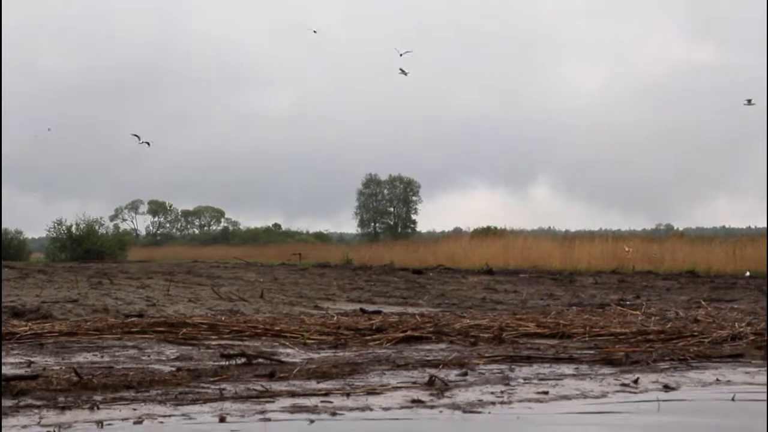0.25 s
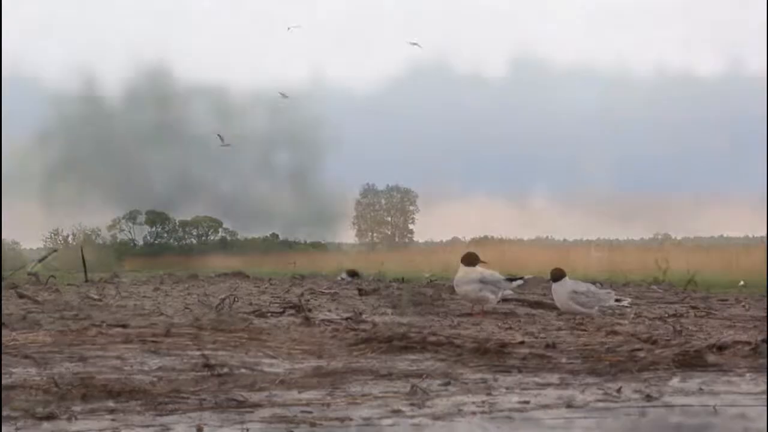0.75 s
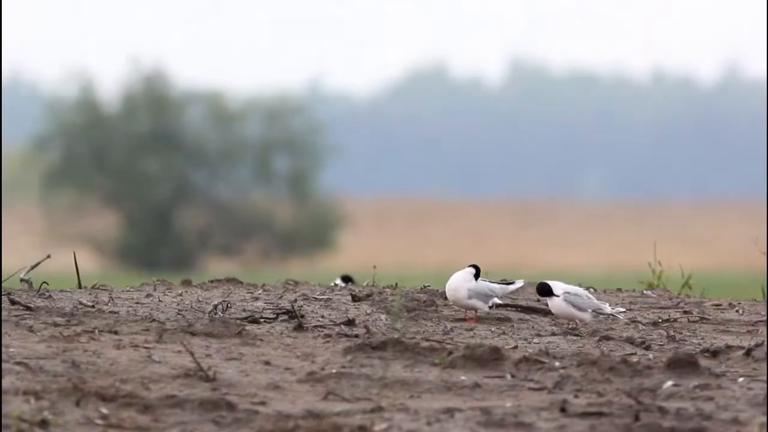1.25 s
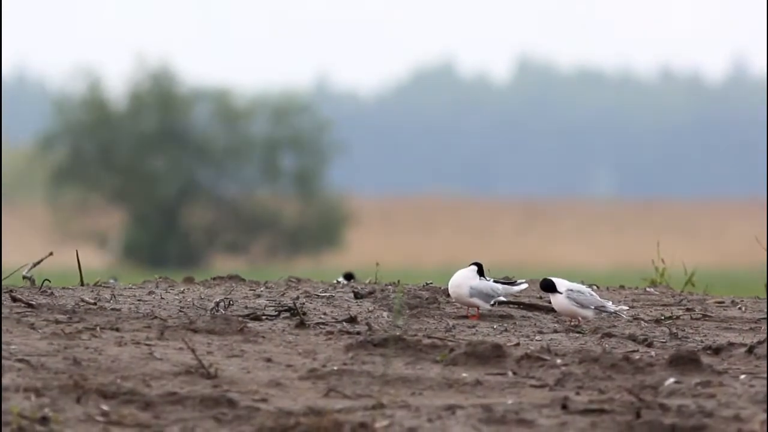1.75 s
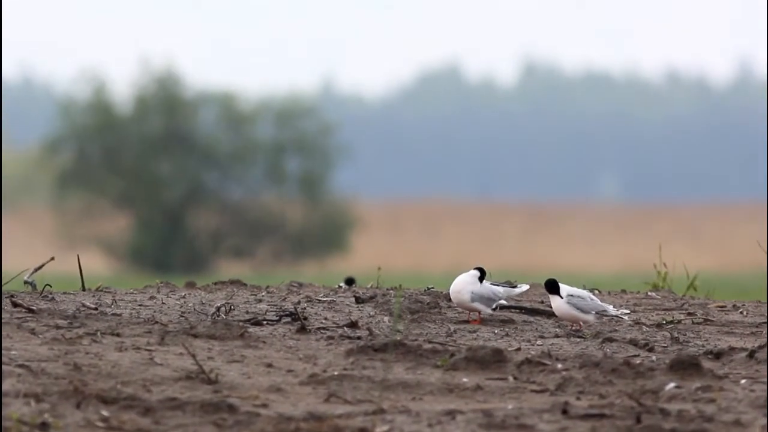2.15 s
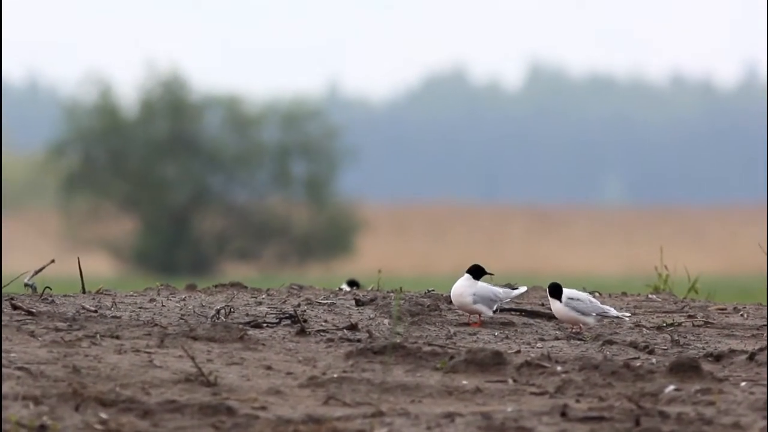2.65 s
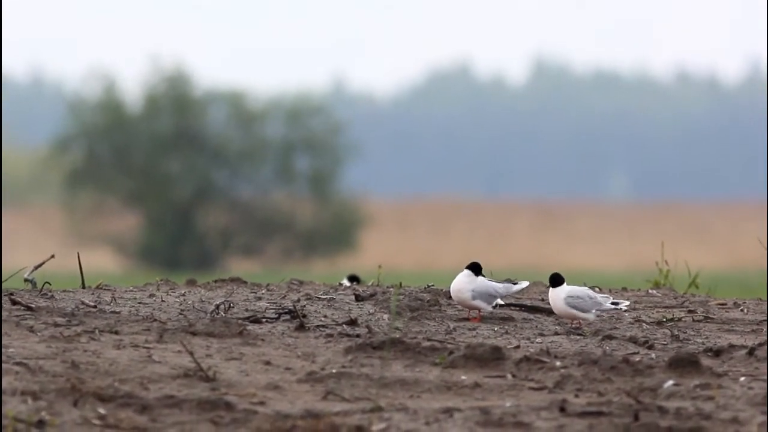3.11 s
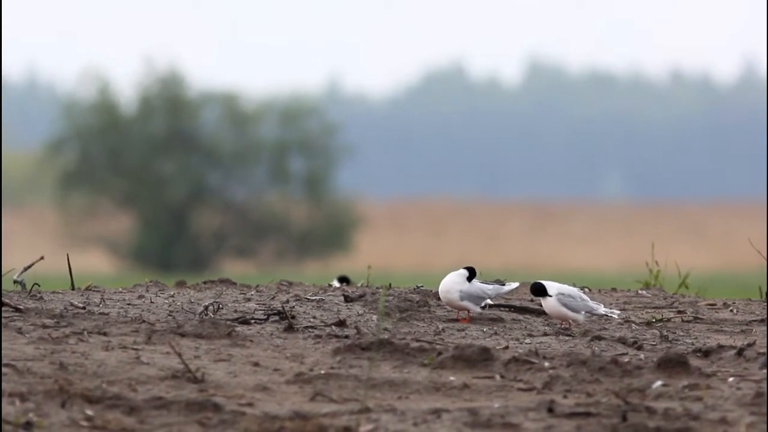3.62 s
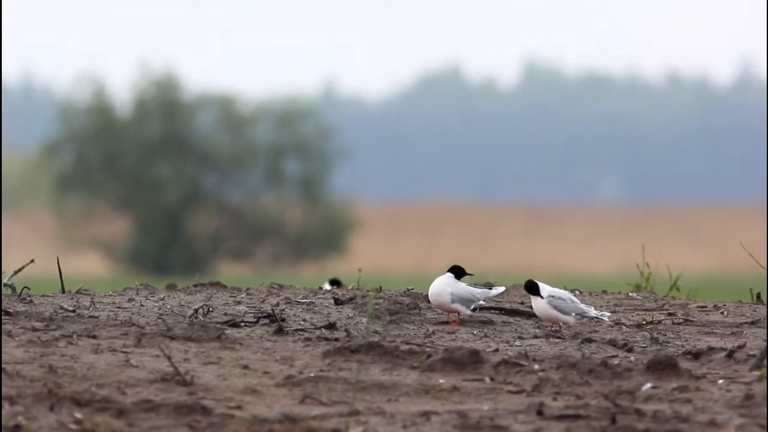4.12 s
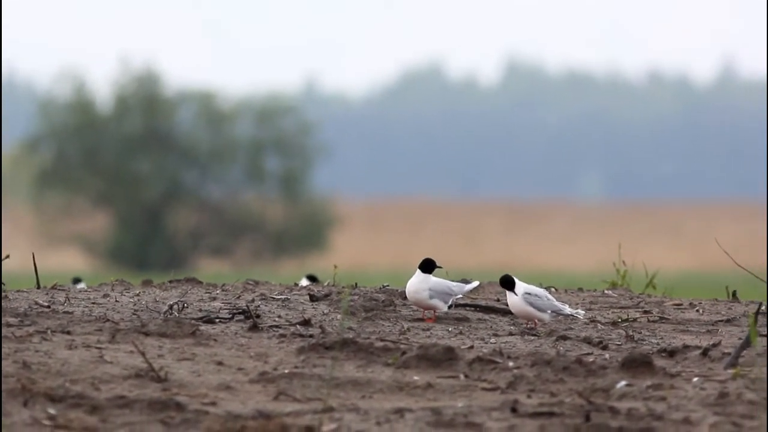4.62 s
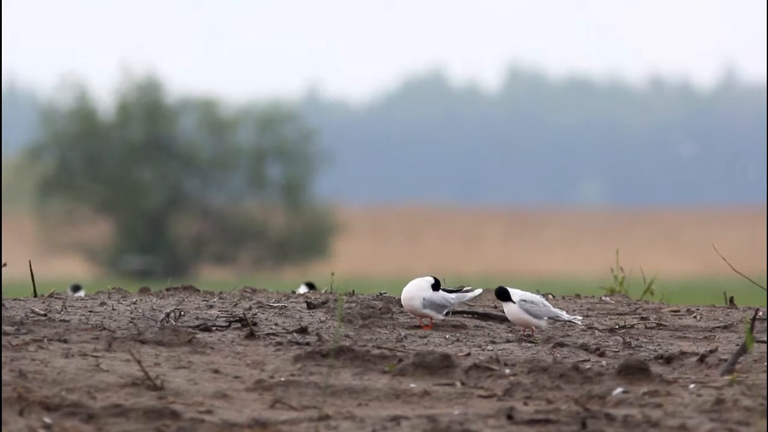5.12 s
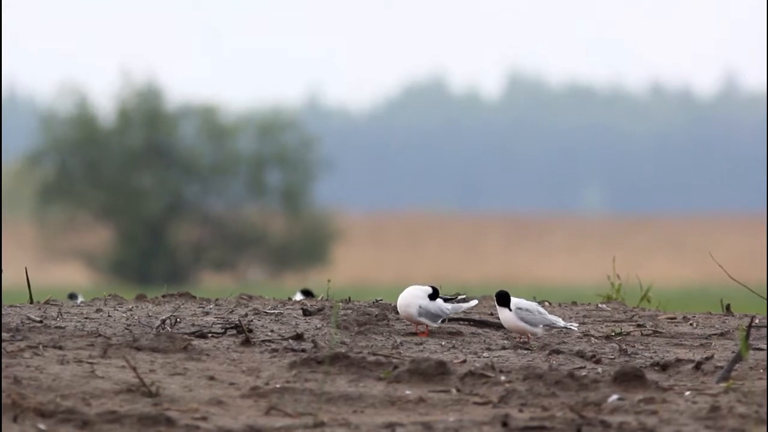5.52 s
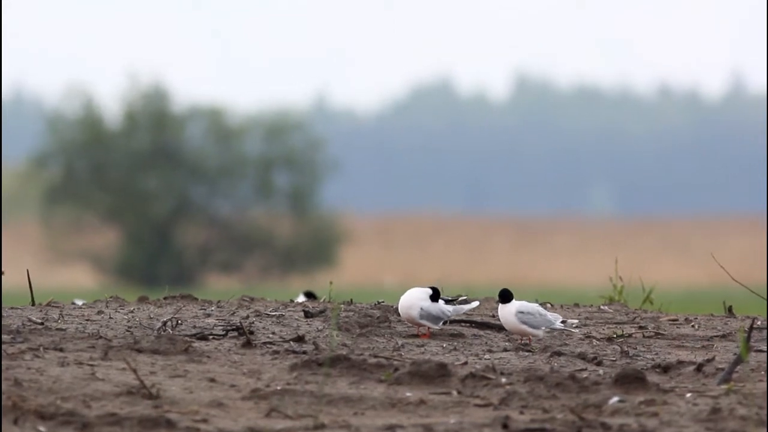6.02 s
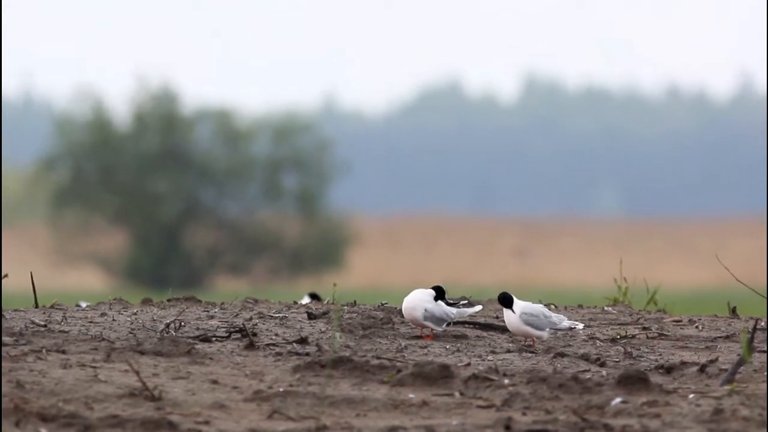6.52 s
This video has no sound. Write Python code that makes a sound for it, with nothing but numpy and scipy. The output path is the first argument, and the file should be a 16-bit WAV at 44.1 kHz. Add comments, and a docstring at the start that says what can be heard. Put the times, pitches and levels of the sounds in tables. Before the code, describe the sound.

A dense, close din of squawking gulls over a mudflat stops abruptly, leaving quieter scattered calls, dry ticking and soft open-air murmur.

```python
"""Gull colony on a riverside mudflat

A close, dense din; from 1.218 s a quieter spot with scattered calls.
Calls: falling harmonic stacks shaped by a throat resonance, some starting with a squeak or hoarse.
Din: many overlapping calls, coloured noise and a thin sine whine.
Quiet spot: fainter gulls, far rasps and a whistle (swept sines), murmuring noise, ringing dry ticks."""
import sys
import numpy as np
from scipy import signal
from scipy.fft import rfft, irfft
from scipy.io import wavfile

SR = 44100
rng = np.random.default_rng(int(sys.argv[2]) if len(sys.argv) > 2 else 0)


def waveform_to_disk(signal):
    """Save audio, clipped to [-1, 1], as 16-bit WAV at the path in sys.argv[1]."""
    frames = np.transpose(np.atleast_2d(signal))
    scaled = np.clip(frames, -1, 1) * 32767
    samples = np.round(scaled).astype(np.int16)
    wavfile.write(sys.argv[1], SR, samples)


N = 298116
T = np.arange(N) / SR

# calls that stand out: start_s, length_s, pitch_hz, sag_per_s (share of pitch), level_db (nominal),
# throat_hz, hoarseness (0-1)
GULL_CALL_TABLE = [(0.0, 0.13, 919, 0.5, -30, 2100, 0.14), (0.093, .1, 1341, 0.5, -27.5, 2830, 0.14),
                   (0.167, 0.1, 1393, 0, -31.5, 2380, 0.1), (0.268, 0.057, 989, -1, -22.5, 2320, 0.21),
                   (0.368, 0.063, 1346, -2, -28, 2540, 0.01), (0.401, 0.094, 1220, 1.8, -26, 4200, 0),
                   (0.479, .11, 970, 1.1, -22, 2510, 0.01), (0.524, 0.11, 1400, 1.5, -33.5, 2850, 0.16),
                   (0.678, 0.054, 1009, -0.2, -26, 2780, 0.33), (0.74, 0.091, 1052, 0.13, -20, 3180, 0),
                   (0.839, 0.059, 1067, -3, -27, 2880, 0.27), (0.923, 0.1, 945, 0.5, -28.5, 2560, .15),
                   (0.998, 0.048, 1013, 1, -24, 2550, 0.39), (1.111, 0.11, 1030, 1.7, -28.5, 2870, 0.07),
                   (1.163, 0.07, 994, -1.5, -20, 2400, 0.45), (1.218, 0.084, 948, 2, -31.5, 2850, 0),
                   (1.31, 0.072, 1130, -0.7, -39, 2940, 0.52), (1.491, 0.058, 1170, -.4, -39, 3080, 0.51),
                   (1.685, .076, 1144, -2.6, -39, 2950, .4), (1.886, .046, 1190, -3.5, -38, 3000, .45),
                   (1.927, 0.089, 930, 1.5, -52.5, 3340, .1), (2.031, .09, 1188, 0.4, -51.5, 3700, 0.07),
                   (2.198, 0.087, 910, 2, -36.5, 2910, 0.05), (2.359, 0.089, 1153, 1.2, -45.5, 4400, 0),
                   (2.497, .11, 1045, 1, -50, 2880, 0.04), (2.633, 0.085, 1183, 0.1, -50, 4020, 0.08),
                   (2.947, 0.1, 1040, 1.5, -44, 2280, 0.06), (2.978, .16, 994, 0.6, -47.5, 3120, 0.25),
                   (3.173, .11, 1133, 0.5, -54, 3620, 0), (3.459, 0.15, 1002, 0.9, -49.5, 3000, 0.09),
                   (3.602, .09, 1108, 1.1, -45, 4370, .08), (3.701, .12, 1034, 1.5, -45.5, 2590, .1),
                   (3.839, 0.094, 920, 2, -37, 2750, .15), (3.911, 0.081, 1030, -1.5, -50, 2700, 0.26),
                   (4.056, 0.11, 974, -0.2, -53.5, 2950, 0.3), (4.244, 0.12, 1032, 1, -45.5, 2750, 0.16),
                   (4.293, .133, 1016, 0.5, -49, 2770, 0.1), (4.453, .12, 1060, 1.6, -43, 4030, .12),
                   (4.593, 0.089, 1058, -0.5, -51.5, 3300, 0.28), (4.664, .14, 990, 3, -45, 2650, .05),
                   (4.792, 0.076, 1054, -3, -50, 3340, 0.1), (4.903, 0.18, 925, .2, -52.5, 3170, 0.18),
                   (5.061, 0.037, 880, 5.5, -45, 2700, 0.3), (5.101, 0.15, 1010, 0.8, -47, 2770, 0.15),
                   (5.229, 0.097, 1054, -0.6, -48, 2550, 0.2), (5.242, .1, 1083, 1.5, -43, 3660, 0),
                   (5.33, 0.097, 953, 1.6, -42.5, 2800, 0.09), (5.336, .127, 1137, 0.4, -47, 3600, .15),
                   (5.548, .051, 866, 3.5, -43, 2940, .35), (5.717, .122, 1024, -0.03, -45, 2640, 0.11),
                   (5.837, 0.13, 934, -0.2, -54.5, 2850, 0.18),
                   (5.945, 0.13, 1005, 0.54, -47.5, 2550, 0.07), (6.143, 0.15, 995, 2, -46.5, 2780, 0.06),
                   (6.234, .055, 820, 6, -49, 2700, 0.2), (6.32, 0.094, 916, -0.5, -54.5, 2980, 0.12),
                   (6.391, 0.17, 1020, 0.1, -47, 2680, 0.27), (6.557, 0.1, 1100, 1.4, -47, 3940, 0.04),
                   (6.66, 0.063, 1087, 1, -46.5, 2600, 0.4)]
# high-register starts of a voice: start_s, length_s, level_db (rms)
SQUEAK_TABLE = [(0, 0.0053, -37), (1.492, 0.0067, -33.5), (1.885, 0.0051, -30), (2.943, 0.0068, -37.5),
                (3.696, 0.0066, -37.5), (4.236, 0.016, -38.5), (4.669, .012, -36.5), (5.057, 0.017, -39.5),
                (5.551, 0.0065, -36), (6.235, 0.014, -41)]
# voice colour in the crowd: freq_hz, gain_db
CROWD_VOICE_COLOUR = [(1000, 4), (1500, -4), (2100, -2), (3000, -3.5), (4000, -1.5), (5000, -0.5),
                      (5900, 2), (7000, -2.5), (9000, -1), (13000, -7.5)]
# voice colour at the quiet spot: freq_hz, gain_db
CALM_VOICE_COLOUR = [(1000, 7), (1500, -11), (2100, 2), (4000, -1), (5000, -2.5), (5900, 0), (7000, -6),
                     (9000, -5.5), (13000, -6.5)]
# level of the din: time_s, level_db
DIN_LEVEL = [(0, -22.5), (.15, -24.5), (.33, -25), (.46, -22), (.65, -23.5), (.91, -26), (1.08, -27),
             (1.16, -24), (1.21, -22)]
# noise spectrum of the far mass of the colony: freq_hz, density_db (relative, per Hz)
DIN_SPECTRUM = [(25, -34), (60, -21.5), (120, -16), (200, -27.5), (400, -18.5), (700, -8.5), (1000, -15),
                (1350, -12), (2000, 2), (2900, -3), (4000, -9), (5600, -16), (7200, -36), (10000, -34),
                (14000, -51)]
# far rasping cries: start_s, length_s, arch_top_hz, level_db (rms)
RASP_TABLE = [(2.152, 0.41, 2106, -57), (2.741, 0.46, 2060, -54.5), (3.252, .4, 2237, -59)]
# a far bird's long whistle: time_s, pitch_hz, level_db
WHISTLE_TRACK = [(1.41, 2800, -67), (1.431, 2590, -54.5), (1.5, 2420, -47), (1.601, 2294, -56),
                 (1.7, 2306, -48), (1.8, 2250, -55.5), (1.86, 2350, -70)]
# tick resonances: freq_hz, width_hz, gain_db
TICK_RESONANCES = [(3940, 3100, 7), (6730, 990, 4.5), (9260, 500, -7.5)]
# noise spectrum of the open air: freq_hz, density_db (relative, per Hz)
AIR_SPECTRUM = [(25, -40), (60, -8.5), (180, -8.5), (300, 0), (650, -5), (1000, -4.5), (1400, 0),
                (1900, -6), (3300, -7), (4000, -11.5), (5000, -16.5), (7000, -23), (11000, -31),
                (14000, -37)]
# humming bands in the air: freq_hz, width_hz, level_db (rms)
AIR_HUM_BANDS = [(504, 32, -63), (779, 47, -60), (1408, 120, -63)]

CHANGE_S, CHANGE_FADE_S = 1.218, 0.003  # din gives way to the quiet spot
TOP_HZ = 13800
DROP, HOARSE_DROP = 0.25, 0.246  # share of nominal pitch lost over a call; extra at hoarseness 1
FADE_DB, HOARSE_PUSH_DB = 6.5, 11.5  # fall over a clear call; counter-rise at hoarseness 1
TREBLE_DB_PER_OCTAVE = -1.8  # above 3 kHz, for a 3 kHz throat
SHRILL_DULLS_DB = 4.5  # extra treble slope per octave of throat tuning above 3 kHz
SQUEAK_HZ = 2760
MUD_ECHO_S, MUD_ECHO = 0.00049, 0.28  # delay and greatest strength of the mud reflection
NEAR_DB = -35.5  # calls this loud get the full reflection, fainter ones less
TICKS_FROM_S, TICK_GAP_S = 1.6, 0.077
TICK_DB, TICK_SPREAD_DB = -43.5, 1.2  # peak, before the low-pass
AIR_DB, DIN_AIR_DB = -53.5, -49.5


def gull(length_s, call_hz, sag_per_s, throat_hz, hoarse, colour, jitter, shimmer_db,
         attack_s=0.0021, follow=0.4, rasp=0.11, waver_db=2.5):
    """One call: pitch sags (negative sag: arches), then drops with pressure; hoarseness adds half harmonics."""
    t = np.arange(int(length_s * SR)) / SR
    u, n = t / length_s, len(t)

    drop = (DROP + HOARSE_DROP * hoarse) * (u ** 3 - 0.5 ** 3)
    pitch_hz = call_hz * (1 - sag_per_s * (t - length_s / 2) - drop)
    fast_jitter = jitter * (1 + 4 * hoarse) * walk(n, 597)
    slow_jitter = 0.0029 * walk(n, 61.6)
    pitch_hz = pitch_hz * (1 + fast_jitter + slow_jitter)
    phase = 2 * np.pi * np.cumsum(pitch_hz) / SR

    k = np.arange(2, 25)[:, None] / 2  # 1, 1.5, 2 ... 12
    hz = k * pitch_hz
    # throat resonance partly follows the pitch
    moving_throat_hz = throat_hz * (pitch_hz / call_hz) ** follow
    gain = resonance(hz, moving_throat_hz, q=1.73) * spectrum_gain(colour, hz)
    slope_db = TREBLE_DB_PER_OCTAVE - SHRILL_DULLS_DB * np.log2(throat_hz / 3000)
    gain = gain * undb(slope_db * np.log2(np.maximum(hz / 3000, 1)))
    gain = gain * np.where(k % 1, hoarse + 0.0077, 1) * (hz < TOP_HZ)
    # each partial wavers on its own, high ones most
    partial_walks = np.array([walk(n, 56.3) for _ in k])
    gain = gain * undb(waver_db * np.sqrt(hz / throat_hz) * partial_walks)
    start_phase = rng.uniform(0, 2 * np.pi, k.shape)
    voice = np.sum(gain * np.sin(k * phase + start_phase), axis=0)

    swell_db = (HOARSE_PUSH_DB * hoarse - FADE_DB) * (u - 0.5)
    envelope = np.minimum(t / attack_s, 1) * (1 - u ** 8)
    pressure = envelope * undb(swell_db + shimmer_db * walk(n, 130.0))
    return np.sqrt(2) * voice * pressure * (1 + rasp * walk(n, 1500))


def near_gulls(calm_db=0.19):
    """Calls that stand out, shimmering more in the crowd; returns crowded and calm calls."""
    crowded, calm = np.zeros(N), np.zeros(N)
    for start_s, length_s, hz, sag_per_s, db, throat_hz, hoarse in GULL_CALL_TABLE:
        voice = (length_s, hz, sag_per_s, throat_hz, hoarse)
        if start_s < CHANGE_S:
            call = gull(*voice, CROWD_VOICE_COLOUR, jitter=0.007, shimmer_db=2.5)
            add(crowded, start_s, undb(db) * call)
        else:
            call = gull(*voice, CALM_VOICE_COLOUR, jitter=0.0071, shimmer_db=1.63)
            add(calm, start_s, undb(db + calm_db) * mud_echo(call, db))
    return crowded, calm


def mud_echo(call, db):
    """Direct sound plus a delayed reflection off wet mud: dips near 1 and 3 kHz, deepest for loud calls."""
    share = MUD_ECHO * min(undb(db - NEAR_DB) ** 2, 1)
    t = T[:len(call)]
    reflection = np.interp(t - MUD_ECHO_S, t, call, left=0)
    return (call + share * reflection) / np.hypot(1, share)


def squeaks(octave_db=-17, edge_s=0.0014):
    """Voices starting in the high register: milliseconds of steady tone with a weak octave."""
    out = np.zeros(N)
    for start_s, length_s, db in SQUEAK_TABLE:
        t = np.arange(int(length_s * SR)) / SR
        phase = 2 * np.pi * SQUEAK_HZ * t
        tone = unit_rms(np.sin(phase) + undb(octave_db) * np.sin(2 * phase))
        gate = np.clip(np.minimum(t, length_s - t) / edge_s, 0, 1)
        add(out, start_s, undb(db) * gate * tone)
    return out


def colony(count=60, voices_db=-6, blur_db=-13, pitch_hz=1100, throat_hz=2450):
    """Many gulls calling over each other, the farthest merged into a noise blur."""
    voices = np.zeros(N)
    for i, (when, span, high, sag, size, throat, hoarse) in enumerate(rng.random((count, 7))):
        call = gull(0.05 + 0.09 * span, pitch_hz * (0.71 + 0.55 * high), 3 * sag - 1,
                    throat_hz * (0.78 + 0.58 * throat), 0.404 * hoarse ** 2, CROWD_VOICE_COLOUR,
                    jitter=0.0049, shimmer_db=3.0, attack_s=0.005)
        add(voices, (i + when) / count * (CHANGE_S + 0.2), undb(-8 * size) * call)
    voices = np.roll(voices, -SR // 10)  # din already under way at the start
    voices = voices / np.std(voices[T < CHANGE_S])
    level = undb(np.interp(T, *np.transpose(DIN_LEVEL)))
    return level * (undb(voices_db) * voices + undb(blur_db) * coloured(DIN_SPECTRUM))


def whine(hz=1143, db=-42.5):
    """Thin sine tone at fixed pitch, its level wandering slightly."""
    return undb(db + 0.91 * walk(N, 13)) * unit_rms(np.sin(2 * np.pi * hz * T))


def stray_gulls(count=13, db=-56, spread_db=5, pitch_hz=1060, throat_hz=3200):
    """Fainter, farther birds: calls of random pitch and hoarseness spread over the quiet spot."""
    out = np.zeros(N)
    for i, (when, span, high, sag, far, hoarse) in enumerate(rng.random((count, 6))):
        call = gull(0.07 + 0.07 * span, pitch_hz * (0.82 + 0.3 * high), sag, throat_hz, 0.32 * hoarse,
                    CALM_VOICE_COLOUR, jitter=0.0059, shimmer_db=4.8, attack_s=0.0041)
        start_s = CHANGE_S + (i + when) / count * (T[-1] - CHANGE_S)
        add(out, start_s, undb(db - spread_db * far) * call)
    return out


def far_birds(rough=0.0515, flutter_db=4.0):
    """One long whistle (gliding sine) and arched cries made raspy by fast pitch and level wander."""
    time_s, hz, db = np.transpose(WHISTLE_TRACK)
    pitch_hz = np.interp(T, time_s, hz) * (1 + 0.0052 * walk(N, 119))
    tone = unit_rms(np.sin(2 * np.pi * np.cumsum(pitch_hz) / SR))
    level = undb(np.interp(T, time_s, db) + 1.5 * walk(N, 29.5))
    out = tone * level * (T > time_s[0]) * (T < time_s[-1])
    for start_s, length_s, top_hz, db in RASP_TABLE:
        n = int(length_s * SR)
        u = np.linspace(-1, 1, n)
        pitch_hz = top_hz * (1 - 0.22 * u ** 2) * (1 + rough * walk(n, 900))
        cry = np.sin(2 * np.pi * np.cumsum(pitch_hz) / SR) * undb(flutter_db * walk(n, 196))
        add(out, start_s, undb(db) * unit_rms(cry * signal.windows.tukey(n, 0.2)))
    return out


def ticks(count=68):
    """Dry ticks at uneven gaps: brief noise scratches exciting three broad resonances."""
    out, t = np.zeros(N), np.arange(SR // 100) / SR
    for i in range(count):
        scratch = rng.standard_normal(len(t)) * np.exp(-t / 0.0013)
        tick = sum(undb(db) * ring(scratch, hz, width_hz) for hz, width_hz, db in TICK_RESONANCES)
        size = undb(TICK_DB + TICK_SPREAD_DB * rng.standard_normal())
        start_s = TICKS_FROM_S + TICK_GAP_S * (i + rng.random())
        add(out, start_s, size * tick / np.abs(tick).max())
    return signal.sosfilt(signal.butter(10, 10500, fs=SR, output="sos"), out)


def air():
    """Murmur of open country: coloured noise plus soft humming bands of filtered noise."""
    hums = sum(undb(db) * unit_rms(ring(rng.standard_normal(N), hz, width_hz))
               for hz, width_hz, db in AIR_HUM_BANDS)
    return undb(AIR_DB + 0.5 * walk(N, 4.31)) * coloured(AIR_SPECTRUM) + hums


def reeds(x, wet_db, t60_s):
    """Scatter off mud and reeds: convolution with a faint, decaying band-passed noise tail."""
    t = np.arange(SR // 2) / SR
    decay = np.exp(-np.log(1000) * t / t60_s) * (t > 0.004)
    tail = ring(rng.standard_normal(len(t)), 2160, 5000) * decay
    return x + undb(wet_db) * signal.fftconvolve(x, tail / np.linalg.norm(tail))[:N]


def undb(db):
    """Decibels to gain."""
    return 10 ** (np.asarray(db) / 20)


def unit_rms(x):
    """Scale to rms 1."""
    return x / np.sqrt(np.mean(x ** 2) + 1e-20)


def add(out, start_s, x):
    """Mix x into out from start_s on."""
    i = int(np.clip(start_s * SR, 0, N))
    out[i:i + len(x)] += x[:N - i]


def walk(n, rate_hz):
    """Random wander: straight lines between Gaussian knots at rate_hz."""
    knots = rng.standard_normal(int(8 * rate_hz) + 2)
    return np.interp(np.arange(n) / SR * rate_hz, np.arange(len(knots)), knots)


def resonance(hz, centre_hz, q):
    """Gain of a steep resonance, 1 at its centre."""
    return 1 / (1 + (q * (hz / centre_hz - centre_hz / hz)) ** 2)


def ring(x, hz, width_hz):
    """Two-pole band-pass."""
    return signal.lfilter(*signal.iirpeak(hz, hz / width_hz, fs=SR), x)


def spectrum_gain(points, hz):
    """Gain at hz, interpolated over log frequency from (freq_hz, gain_db) points."""
    at_hz, db = np.transpose(points)
    return undb(np.interp(np.log(np.maximum(hz, 1)), np.log(at_hz), db))


def coloured(points):
    """Noise of rms 1 with the given spectrum."""
    gain = spectrum_gain(points, np.fft.rfftfreq(N, 1 / SR))
    return unit_rms(irfft(rfft(rng.standard_normal(N)) * gain, N))


def scene():
    """The scene changes from the din to the quiet spot over a 3 ms crossfade; calm calls and squeaks bypass the
    crossfade."""
    crowded, calm = near_gulls()
    din = reeds(crowded, wet_db=-14, t60_s=0.88) + colony() + whine()
    din = din + undb(DIN_AIR_DB) * coloured(AIR_SPECTRUM)
    quiet = stray_gulls() + far_birds() + ticks() + air()
    changed = np.clip((T - CHANGE_S) / CHANGE_FADE_S + 0.5, 0, 1)
    foreground = reeds(calm + squeaks(), wet_db=-18.5, t60_s=0.2)
    return ((1 - changed) * din + changed * quiet + foreground)[None]


def record(dry):
    """Steep elliptic low-pass at TOP_HZ."""
    return signal.sosfilt(signal.ellip(8, 0.2, 70, TOP_HZ, fs=SR, output="sos"), dry)


dry = scene()
out = record(dry)
waveform_to_disk(out)
```